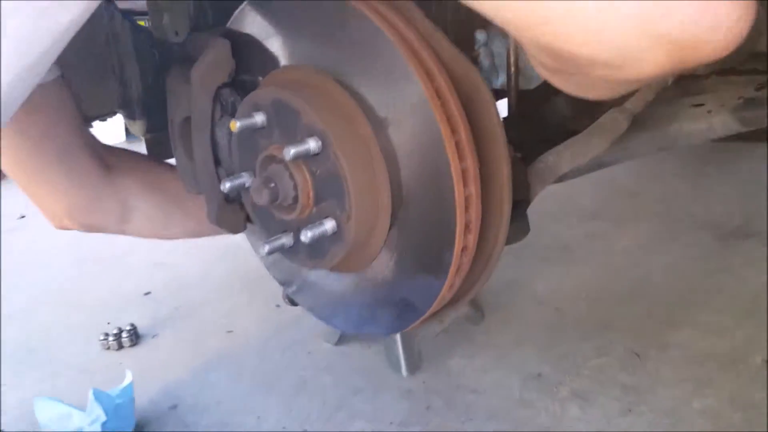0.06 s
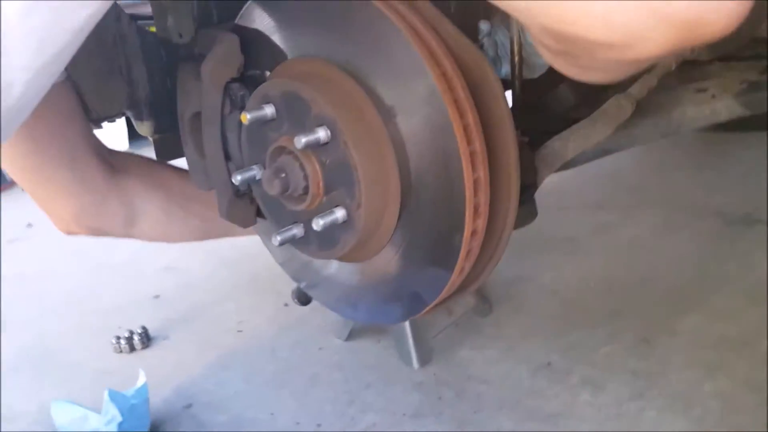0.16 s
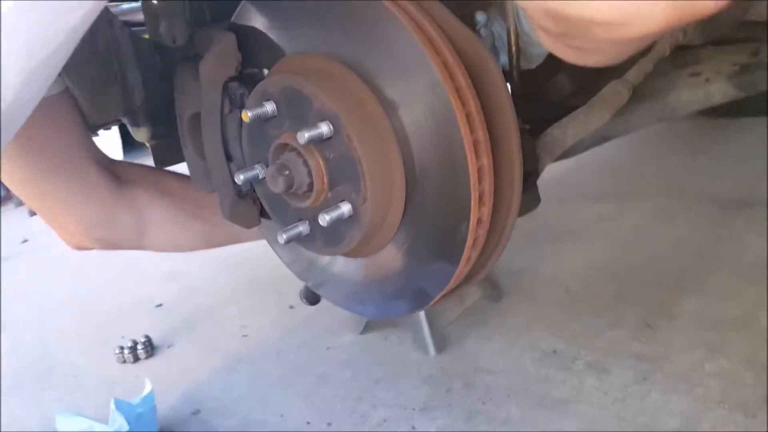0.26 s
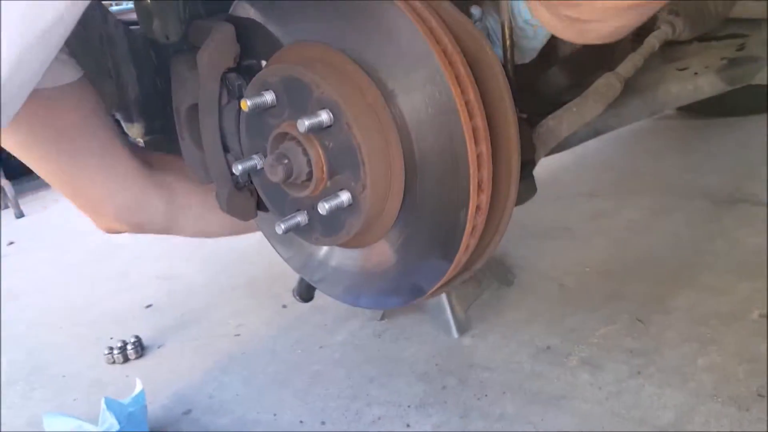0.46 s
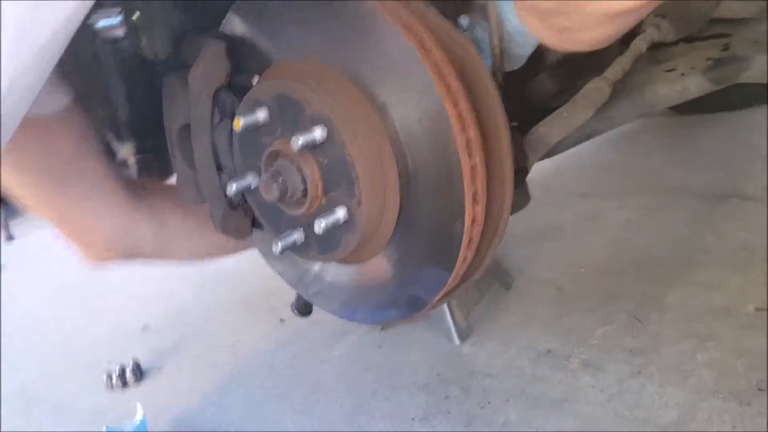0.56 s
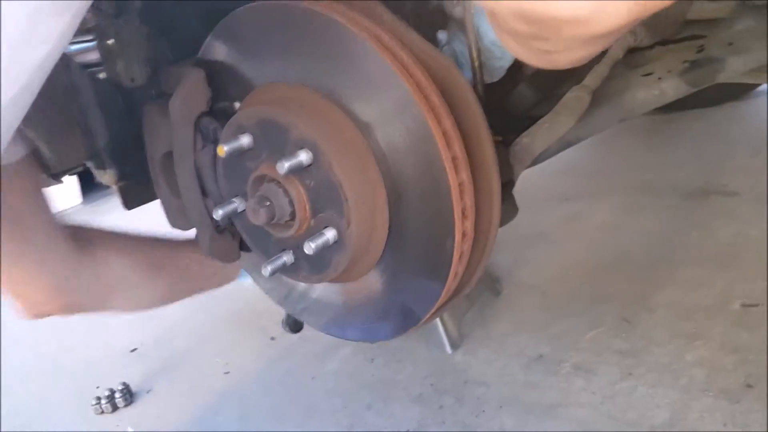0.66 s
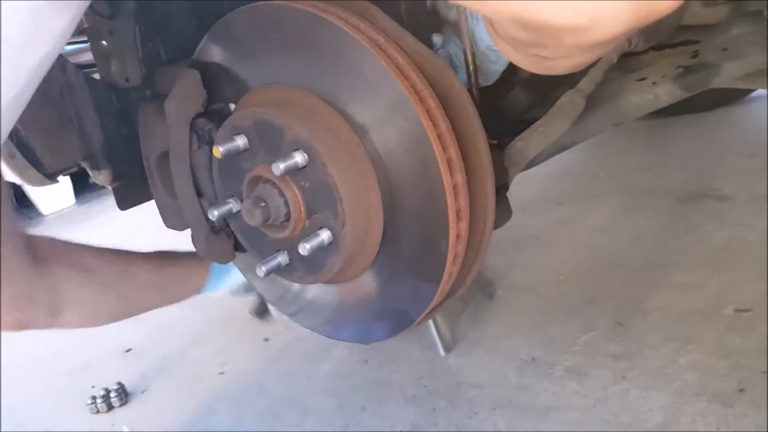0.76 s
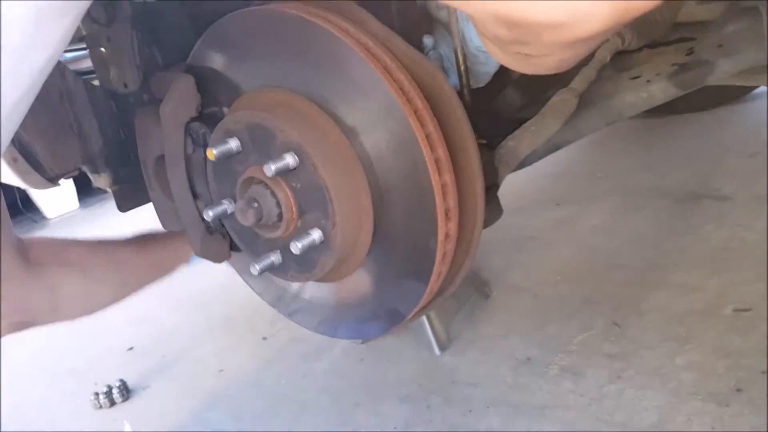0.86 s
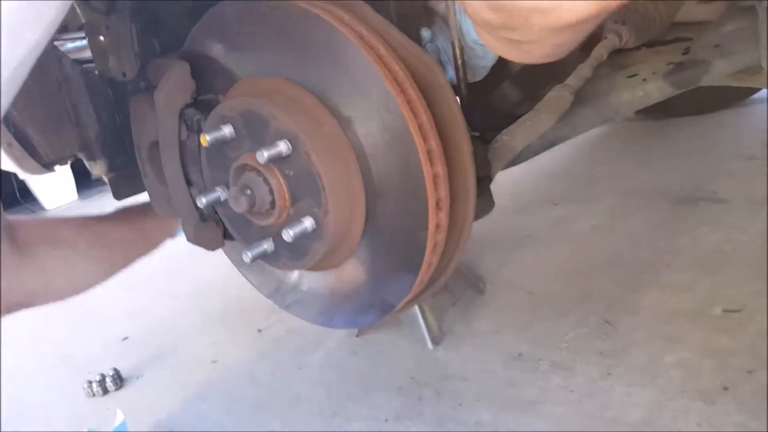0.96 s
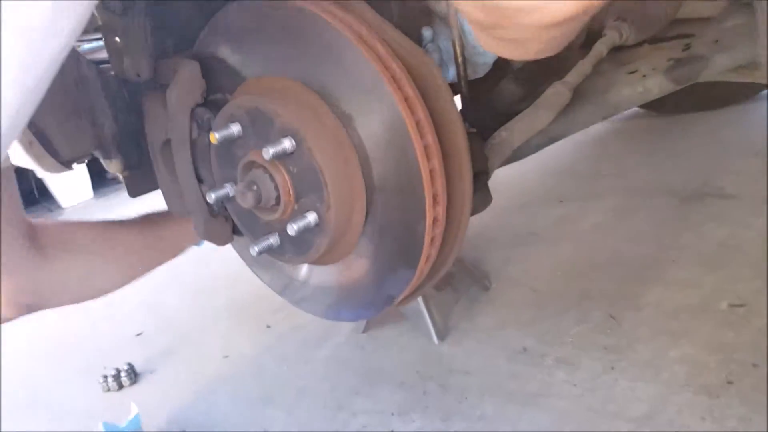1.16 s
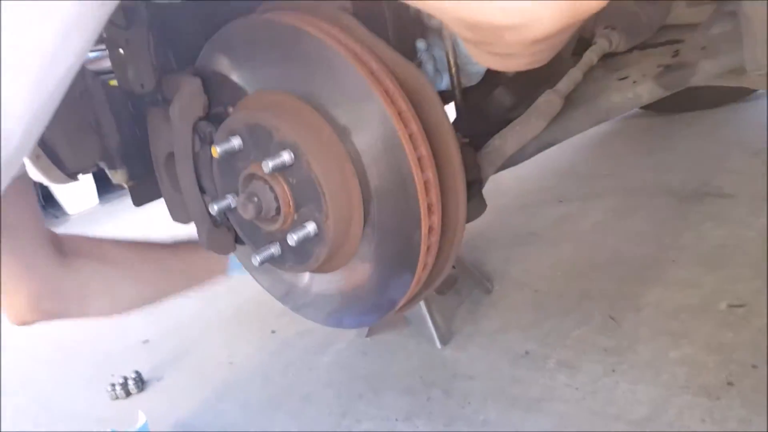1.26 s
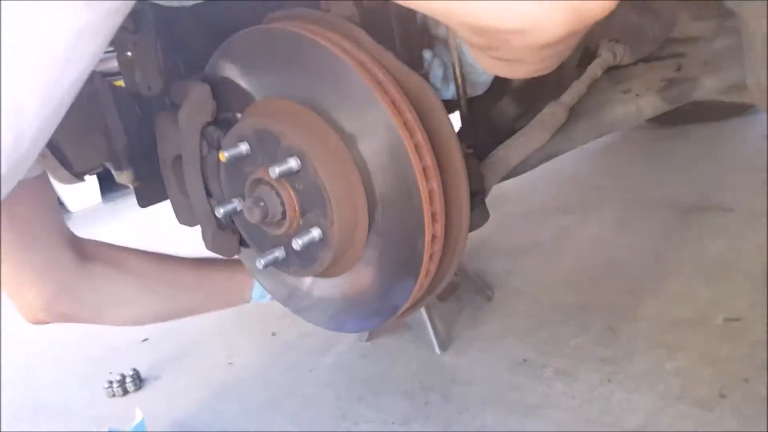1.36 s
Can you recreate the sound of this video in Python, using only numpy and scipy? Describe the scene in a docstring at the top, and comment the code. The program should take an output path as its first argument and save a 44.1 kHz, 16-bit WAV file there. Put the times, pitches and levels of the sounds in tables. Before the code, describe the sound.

Gritty metal scraping on a car's brake disc, one long stroke, then a short clanking one.

```python
"""In a garage, a steel brake part is dragged by hand over a rusty disc and caliper (the brake's clamp):
one long gritty scrape, then a short one. Countless tiny slips shake the ironwork and the suspension.
The disc sings under the rubbing and rings on when the part lifts off; then the caliper clanks.
A brief hiss dies away at the start; light clicks and the rustle of the hand come later,
all over a low room rumble."""
import sys
import numpy as np
from scipy import signal
from scipy.fft import rfft, irfft, next_fast_len
from scipy.io import wavfile
from scipy.ndimage import map_coordinates

SR = 44100
rng = np.random.default_rng(int(sys.argv[2]) if len(sys.argv) > 2 else 0)


def transcribe(u):
    """Save the signal u as a 16-bit wav file named by the first command-line argument.

    u: samples, shape (n,) or (channels, n), limited to [-1, 1]; the rate is SR.
    q: integer samples, one column per channel.
    """
    v = np.clip(np.atleast_2d(u).T, -1, 1)
    q = np.round(v * 32767).astype(np.int16)
    wavfile.write(sys.argv[1], SR, q)


N = 61739
TIME = np.arange(N) / SR

# how the long and the short scrape swell and fade: t/s, grinding level/dB, rust grit level/dB
LONG_STROKE = [(.172, -55, -52.5), (.196, -44.5, -48), (.213, -33.5, -40.5), (.222, -23.5, -39.5),
               (.255, -21.5, -32), (.298, -22.5, -37), (.319, -16.5, -28.5), (.395, -18.5, -34),
               (.426, -20, -31.5), (.455, -16.5, -32), (.508, -22, -30), (.556, -24.5, -39.5),
               (.585, -47.5, -52), (.62, -46.5, -64.5)]
SHORT_STROKE = [(.752, -63, -80.5), (.762, -45.5, -65), (.766, -41, -39), (.785, -31, -34),
                (.803, -31.5, -38.5), (.824, -40, -43), (.84, -61.5, -60)]
# the caliper's modes (the notes it naturally rings at): f/Hz, level/dB
CALIPER_MODES = [(325, -3), (463, -4), (614, -1), (735, -7), (865, -1), (1238, -9), (1395, -5), (1915, -5),
                 (2780, -6), (3000, -4), (3420, -6), (4335, -6)]


def amp(db):
    """Turn decibels into a factor to multiply a sound by."""
    return 10 ** (np.asarray(db) / 20)


def unit(x):
    """Scale a sound to an average (rms) strength of 1."""
    return x / np.sqrt(np.mean(x ** 2) + 1e-20)


def along(points, hz):
    """Read between (frequency, value) points, giving every octave equal room."""
    f, values = np.transpose(points)
    return np.interp(np.log(hz + 1), np.log(f + 1), values)


def levels(rows):
    """One loudness curve for each dB column; silent before the first row and after the last."""
    times, *columns = np.transpose(rows)
    return [amp(np.interp(TIME, times, db, left=-np.inf, right=-np.inf)) for db in columns]


def wobble(rate):
    """A smooth curve through `rate` random values a second."""
    return map_coordinates(rng.standard_normal(N), [TIME * rate + 2])


def fade(t, t60):
    """A dying-away curve that has dropped by 60 dB after t60 seconds."""
    return np.exp(-np.log(1000) * t / t60)


def filtered(x, response):
    """Turn each frequency up or down by the factor response(hz)."""
    size = next_fast_len(N + SR // 2)
    return irfft(rfft(x, size) * response(np.fft.rfftfreq(size, 1 / SR)), size)[..., :N]


def spread(pair, response):
    """Filter two unrelated sounds into left and right, nearly the same in the bass."""
    # how alike the two sides are: f/Hz, likeness (1 = the same, 0 = unrelated)
    likeness = [(150, 0.92), (500, 0.62), (1200, 0), (9000, -0.04)]
    angle = lambda hz: np.arccos(np.clip(along(likeness, hz), -1, 1)) / 2
    mid, side = filtered(pair, lambda hz: response(hz) * np.array([np.cos(angle(hz)), np.sin(angle(hz))]))
    return unit(np.array([mid + side, mid - side]))


def hiss(colour):
    """Steady stereo noise; its colour says how strong each frequency is."""
    return spread(rng.standard_normal((2, N)), lambda hz: amp(along(colour, hz)))


def tone(hz, t):
    """One pure note, slightly out of step between left and right."""
    return np.sin(2 * np.pi * (hz * t + rng.random()) + .5 * rng.standard_normal((2, 1)))


def room_rumble(start_db=-55.5, rise_db_per_s=2.5):
    """The room rumbles quietly, growing a little louder."""
    # colour of the rumble: f/Hz, level/dB
    colour = [(25, -16), (95, -2), (150, -5.5), (400, -18), (1900, -25), (2900, -36), (15500, -61.5)]
    return amp(start_db + rise_db_per_s * TIME) * hiss(colour)


def garage_echo(x, t60=.28, level_db=-20.5):
    """The garage throws the sound back as a short, blurred echo."""
    tail = rng.standard_normal((2, SR // 2)) * fade(TIME[:SR // 2], t60)
    return amp(level_db) * signal.fftconvolve(x, tail / np.linalg.norm(tail[0]), axes=1)[:, :N]


def hiss_and_rustle(flutter_db=2):
    """A brief hiss dies away at the start; later the hand rustles softly among the parts."""
    # loudness of the opening hiss, then of the rustle: t/s, level/dB
    loudness = [(0, -53.5), (.05, -67), (.67, -57), (.70, -50), (.92, -56), (1.1, -55), (1.14, -63),
                (1.4, -65.5)]
    # colour of both: f/Hz, level/dB
    colour = [(200, -17), (500, -5), (2000, -3), (4500, -13.5), (15000, -17)]
    return levels(loudness)[0] * amp(flutter_db * wobble(rate=70)) * hiss(colour)


def clicks(ring_db=-5.5, ring_stretch=1.3):
    """Loose parts touch: each knock is a burst of noise that rings the caliper's modes near its pitch."""
    # clicks and knocks: t/s, level/dB, centre f/Hz, width/octaves, t60/s
    knocks = [(0.796, -25.5, 302, 0.8, 0.045), (.85, -35.5, 1270, 0.45, .05), (.861, -40, 506, .45, 0.09),
              (.953, -38, 6680, 1.3, .03), (0.955, -45.5, 1975, 0.6, .1), (1.333, -52.5, 2305, 1.8, 0.055),
              (1.338, -43.5, 854, 1.04, .08)]
    out = np.zeros((2, N))
    for start, db, centre_hz, octaves, t60 in knocks:
        t = TIME - start
        band = lambda hz: np.exp(-.5 * (np.log2((hz + 1) / centre_hz) / octaves) ** 2)
        burst = spread(rng.standard_normal((2, N)), band) * fade(np.abs(t), t60)
        notes = sum(amp(level) * band(hz) * tone(hz, t) for hz, level in CALIPER_MODES)
        ring = unit(notes) * fade(np.abs(t), ring_stretch * t60)
        out += amp(db) * (t > 0) * (burst + amp(ring_db) * ring)
    return out


def slips(per_s=600, scatter_db=2.5, judder_db=2.14):
    """Steel sticks and slips in tiny jolts of uneven size, bunched by the judder of the hand."""
    happens = rng.random(N) < per_s / SR
    size_db = scatter_db * np.clip(rng.standard_normal(N), -2, 2) + judder_db * wobble(rate=130)
    direction = np.sign(rng.standard_normal(N))
    return unit(happens * amp(size_db) * direction)


def shaken_iron(colour, t60=.016, layers=8, spacing_hz=55, shifts_per_s=13, ripple_db=4.2):
    """Slips briefly ring the iron's crowded modes; which ones stand out shifts as the contact slides."""
    decay = fade(TIME[:SR // 2], t60)
    pair = np.zeros((2, N))
    for _ in range(layers):
        jolts = slips()[None]
        ring = rng.standard_normal((2, len(decay))) * decay
        pair += signal.fftconvolve(jolts, ring, axes=1)[:, :N]
    # lay drifting random peaks and dips over the frequencies, shallower below 1000 Hz
    hz, times, spectrum = signal.stft(pair, SR, nperseg=2048)
    grid = np.meshgrid(hz / spacing_hz, times * shifts_per_s, indexing="ij")
    ripple = map_coordinates(rng.standard_normal(spectrum.shape[1:]), grid)
    depth_db = ripple_db * np.minimum(hz[:, None] / 1000, 1)
    pair = signal.istft(spectrum * amp(depth_db * ripple), SR)[1][:, :N]
    return spread(pair, lambda hz: amp(along(colour, hz)))


def suspension_thrum(gain_db=-4):
    """Both scrapes shake the heavy suspension behind the brake."""
    # how the thrum swells and fades: t/s, level/dB
    loudness = [(.19, -53.5), (.22, -26), (.32, -33.5), (.39, -35.5), (.45, -32), (.565, -31.5), (.6, -54),
                (.74, -56.5), (.8, -36.5), (.84, -54)]
    # its deep colour: f/Hz, level/dB
    colour = [(50, -34.5), (95, -3), (140, -8.5), (185, 1), (280, -5), (600, -5.5), (1500, -70.5)]
    return amp(gain_db) * levels(loudness)[0] * shaken_iron(colour)


def rubbed_mode(force, hz, t60, waver_db=3):
    """A rubbed note builds up and dies away with the force; the shorter it rings, the faster it wavers."""
    waver_rate = 7 / t60
    energy = signal.fftconvolve(force ** 2, fade(TIME, t60) ** 2)[:N]
    swing = np.sqrt(np.abs(energy)) * amp(waver_db * wobble(waver_rate))
    wavering_time = TIME + wobble(waver_rate) / (2 * np.pi * hz)
    return unit(swing * tone(hz, wavering_time))


def rubbed_caliper(t60=.035, gain_db=-8.5):
    """The short stroke makes the caliper clank."""
    force = levels(SHORT_STROKE)[0]
    notes = sum(amp(db) * rubbed_mode(force, hz, t60) for hz, db in CALIPER_MODES)
    return amp(gain_db) * np.sqrt(np.mean(force ** 2)) * notes


def free_disc(lift_s=.545, rise_s=.008, gain_db=-27):
    """Once the part lifts off, the disc rings out."""
    # modes of the untouched disc: f/Hz, level/dB, t60/s
    modes = [(689, -15, .18), (918, -2, .19), (1628, -16, .22), (2124, -11, .47), (2192, 0, .55),
             (2605, -11, .16), (3580, -21, .3), (4554, -18, .23), (6330, -26, .2)]
    t = np.maximum(TIME - lift_s, 0)
    ring = sum(amp(db) * fade(t, t60) * tone(hz, t) for hz, db, t60 in modes)
    return amp(gain_db) * ring * (1 - np.exp(-t / rise_s))


def rubbed_disc(favour_db=11.5, gain_db=-2):
    """The long stroke makes the disc sing; the sliding contact favours one mode after another."""
    # modes of the rubbed disc: f/Hz, level/dB, t60/s, most favoured at t/s
    modes = [(906, -9.5, .13, .55), (1293, -14.5, .08, .38), (1680, -16, .06, .35), (1866, -14, .12, .45),
             (2132, -3.5, .15, .4), (2170, -10.5, .08, .33), (2568, -8, .07, .475), (2603, -10.5, .06, .57),
             (2830, -13.5, .04, .39), (3088, -15, .05, .35), (3610, -14.5, .04, .34),
             (3915, -16.5, .04, .48), (4115, -15, .04, .48), (4340, -18.5, .04, .47)]
    force = levels(LONG_STROKE)[0]
    notes = np.zeros((2, N))
    for hz, db, t60, best_s in modes:
        width_s = .11 * np.sqrt(1000 / hz)  # high notes get a shorter turn
        favour = amp(favour_db * np.exp(-.5 * ((TIME - best_s) / width_s) ** 2))
        notes += amp(db) * rubbed_mode(force * favour, hz, t60)
    return amp(gain_db) * np.sqrt(np.mean(force ** 2)) * notes


def scrape(stroke, colour, grinding_db=2, grit_db=1):
    """One stroke of steel over rust: the parts grind and the fine grit hisses."""
    # bright colour of the rust grit: f/Hz, level/dB
    grit_colour = [(3500, -49), (5500, -2.5), (6900, -6), (9000, -0.5), (11500, -6), (14000, -8.5),
                   (16000, -19.5)]
    grinding, grit = levels(stroke)
    body = amp(grinding_db) * grinding * shaken_iron(colour)
    return body + amp(grit_db) * grit * shaken_iron(grit_colour)


def scene():
    """The long scrape on the disc, a little to the right, then the short one, all in the garage."""
    # colours of the long and the short scrape's grinding: f/Hz, level/dB
    long_colour = [(120, -58), (260, -17), (450, -9), (720, -7.5), (900, 0), (1080, -4.5), (1280, 0),
                   (1700, 0.5), (1980, -3.5), (2750, 0.5), (3400, -4), (4300, -12), (5200, -17.5),
                   (10000, -56)]
    short_colour = [(120, -50), (240, -9), (800, -3), (1200, -9.5), (3000, -2.5), (4400, -9), (6000, -12),
                    (9000, -36.5)]
    # which way the disc's sound leans: f/Hz, left minus right level/dB
    balance = [(300, 4.5), (600, 3), (1100, -2), (2200, -8), (4000, -1.5), (8000, -0.5), (13000, -4)]
    disc = scrape(LONG_STROKE, long_colour) + rubbed_disc() + free_disc()
    disc = filtered(disc, lambda hz: amp(np.outer([.5, -.5], along(balance, hz))))
    caliper = scrape(SHORT_STROKE, short_colour) + rubbed_caliper()
    parts = disc + caliper + suspension_thrum() + clicks()
    return parts + garage_echo(parts) + hiss_and_rustle() + room_rumble()


def record(dry, ceiling=.9, top_hz=15800):
    """Gently round off the tallest peaks and cut away the very highest treble."""
    rounded = dry / (1 + np.abs(dry / ceiling) ** 6) ** (1 / 6)
    return filtered(rounded, lambda hz: hz < top_hz)


dry = scene()
out = record(dry)
transcribe(out)
```